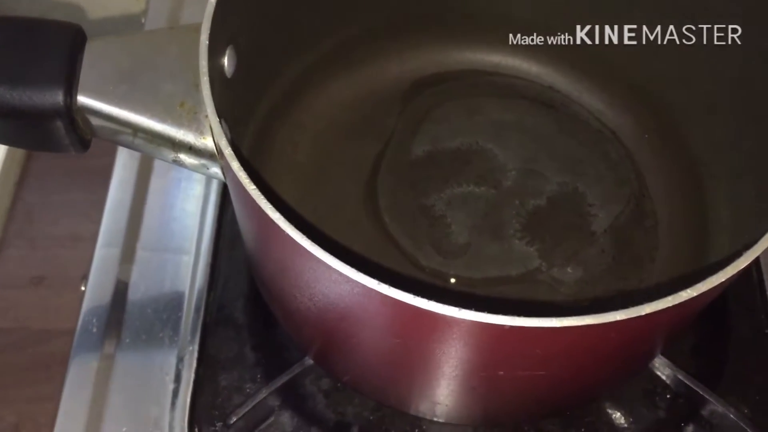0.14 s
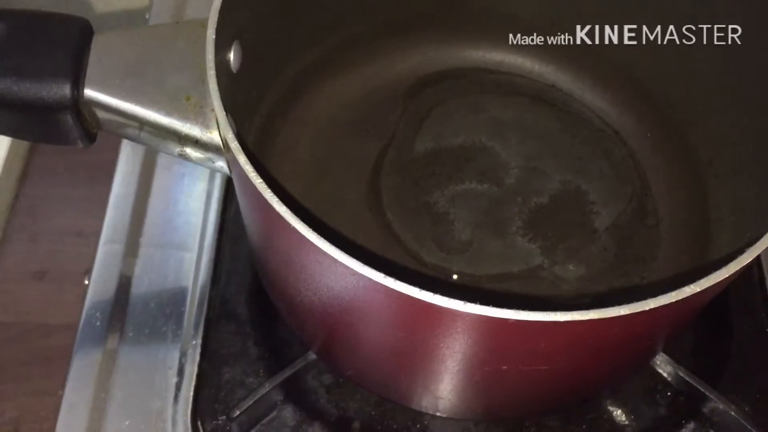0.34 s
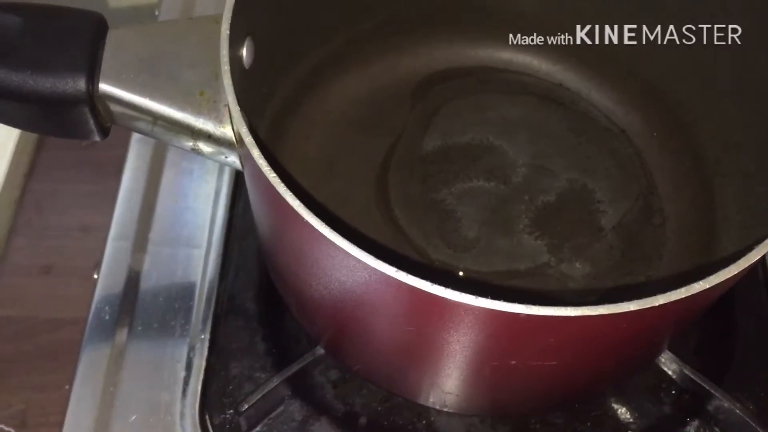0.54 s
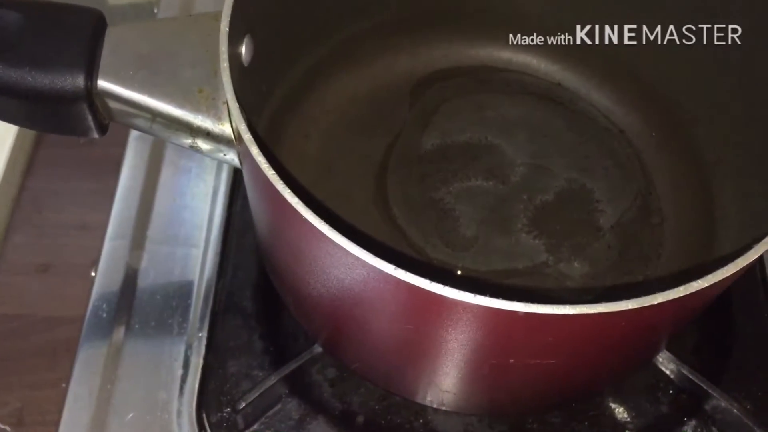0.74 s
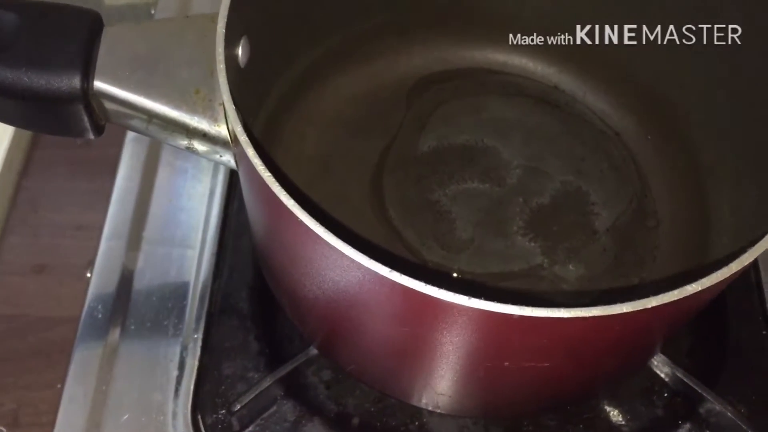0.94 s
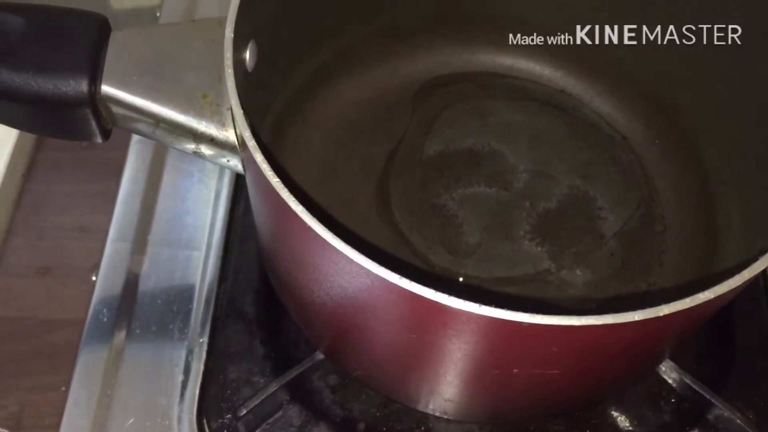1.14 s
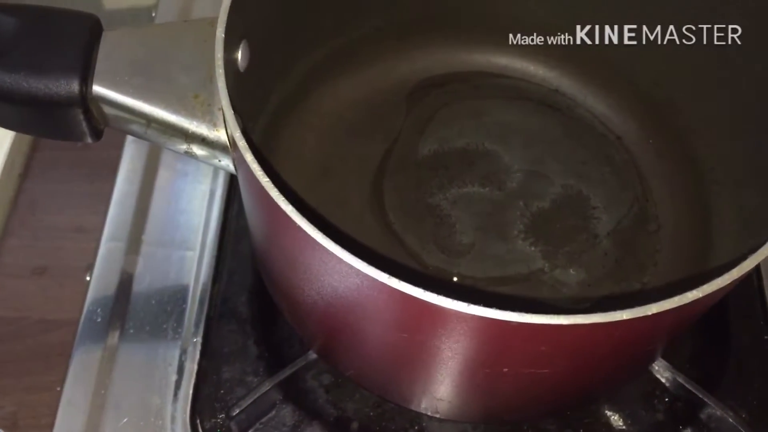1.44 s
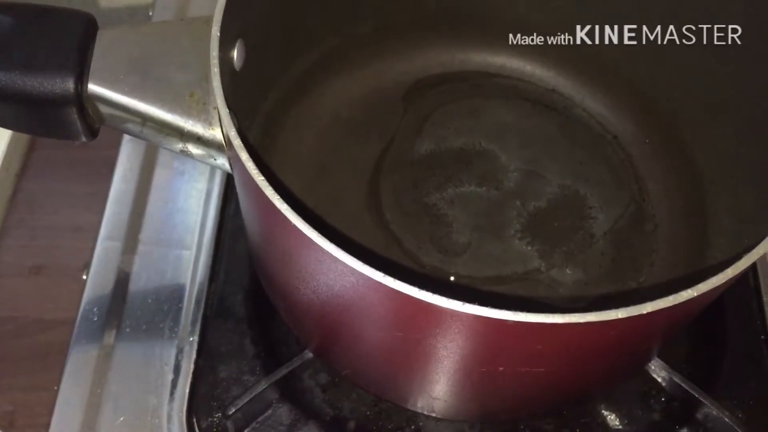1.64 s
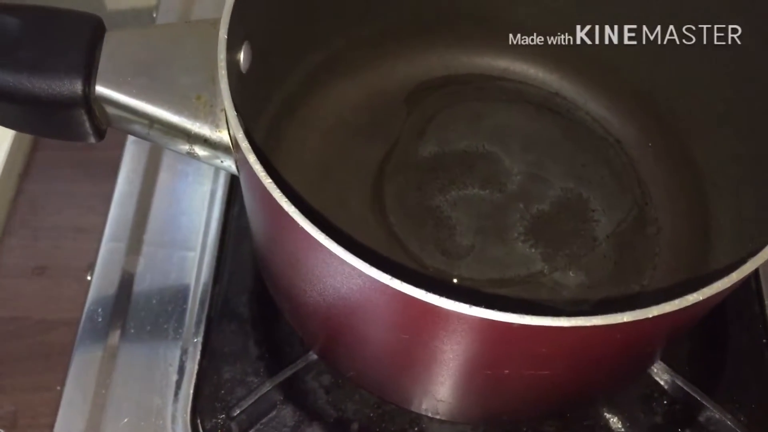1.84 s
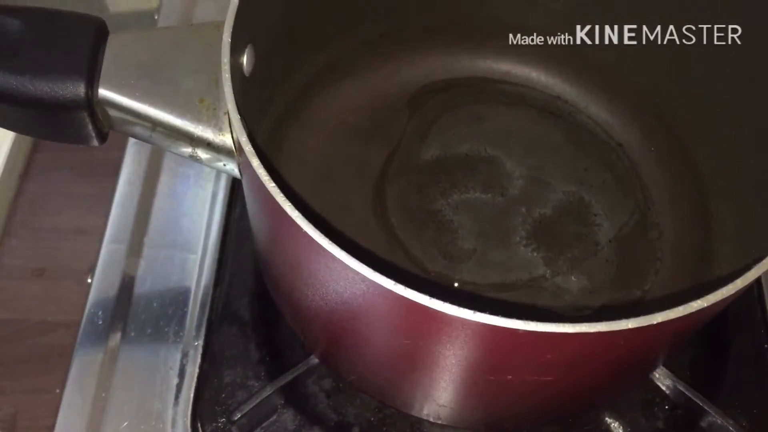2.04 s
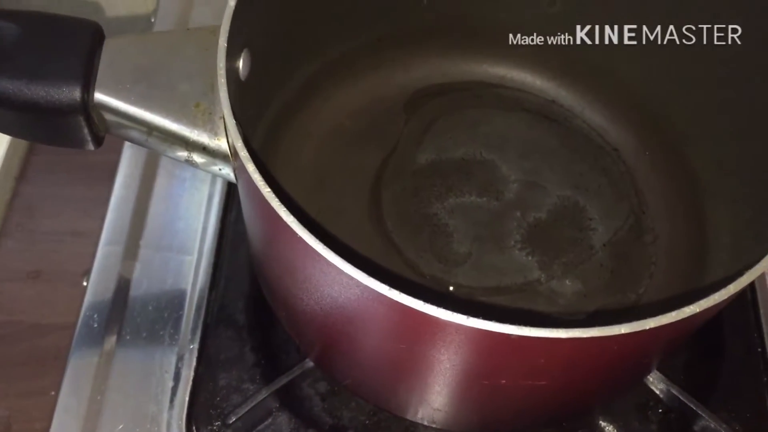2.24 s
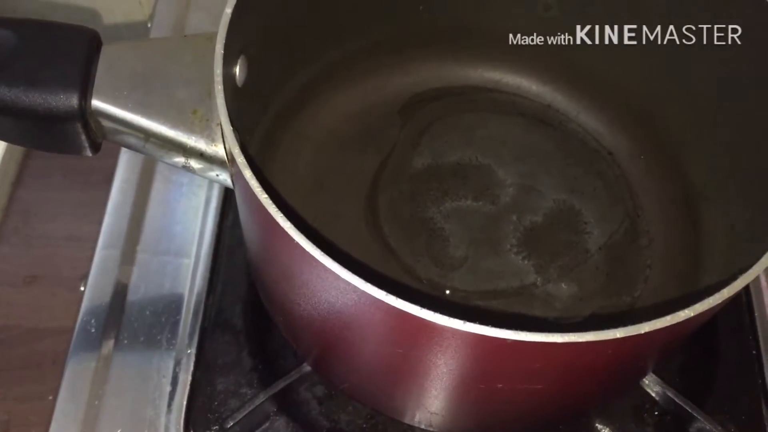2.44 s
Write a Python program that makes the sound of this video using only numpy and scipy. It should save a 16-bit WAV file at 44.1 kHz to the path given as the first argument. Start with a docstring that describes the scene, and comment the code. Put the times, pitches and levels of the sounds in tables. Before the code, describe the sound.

Close to a kitchen stove, a gas flame gives a soft, low roar over a fan's hum. The oil in the saucepan snaps faintly at first, the pan ticks lightly midway, and a few more tiny snaps follow.

```python
"""A gas burner roars softly under a saucepan of oil in a small kitchen.
The flame is a bed of noise that booms in the low resonances of room and stove, and breathes in puffs.
On top, the warming oil snaps, a droplet pings on the rim and the pan ticks on its trivet.
Behind it all, an extractor fan adds mains hum and wavering blade tones."""
import sys
import numpy as np
from scipy import signal
from scipy.fft import rfft, irfft
from scipy.io import wavfile
from scipy.ndimage import uniform_filter1d

SR = 44100
rng = np.random.default_rng(int(sys.argv[2]) if len(sys.argv) > 2 else 0)


def digitize_waveform(pressure):
    """Quantize a signal to 16-bit integers and store it at the path in sys.argv[1].

    Rows of a 2-D input are taken as channels; values are limited to [-1, 1].
    """
    field = np.atleast_2d(pressure).T
    bounded = np.clip(field, -1, 1)
    quanta = np.round(bounded * 32767).astype(np.int16)
    wavfile.write(sys.argv[1], SR, quanta)


N = 114660

# broad colour of flame roar and air rush: frequency_hz, relative_db
ROAR_COLOUR = [(20, -53), (45, -18), (90, -17.5), (105, -10), (150, -11.5), (270, -24), (700, -32.5),
               (1450, -33.5), (1520, -36.5), (2050, -34), (2300, -40.5), (3000, -46.5), (4200, -51.5),
               (4900, -57.5), (6200, -56.5), (9500, -63), (10500, -66), (12500, -64), (15500, -69)]
# resonances of room and stove, with one notch: centre_hz, width_hz, gain_db
ROOM_RESONANCES = [(50, 9.1, 4.5), (112.26, 10.2, 14), (134, 12.8, 11.5), (143.7, 9.8, 6),
                   (174.4, 4.6, 6.5), (182, 4.1, 3.5), (228.3, 16, 5), (286, 14, -7), (353.2, 33, 4),
                   (409, 15, 5.5), (449, 32, 3), (526, 57, 3), (605, 33.5, 9), (646, 24, 7.5),
                   (765, 21, 8.5), (808, 45, 6), (920, 42, 5.5), (1045, 30, 7), (1220, 38, 5),
                   (1298, 20, 5), (1355, 53, 8), (1375, 50, 2.5), (1462, 37, 7.5), (1709, 180, 5),
                   (1960, 28, 5.5)]
# fader rides for the rumble and the sub below it, each taken about its mean: time_s, level_db
RUMBLE_RIDE = [(0, -42), (.3, -40.5), (.7, -39.5), (1.0, -38), (1.3, -42.5), (1.55, -35), (1.75, -42.5),
               (1.9, -42.5), (2.15, -37.5), (2.6, -45)]
SUB_RIDE = [(0, -51), (.7, -50), (.9, -50), (1.6, -45.5), (1.7, -56.5), (2.2, -53), (2.6, -50)]
# oil snaps: start_s, peak_db, low_hz, high_hz
OIL_SNAPS = [(0.0425, -50, 5500, 16000), (0.1254, -38.5, 2500, 9500), (0.1266, -38, 14000, 18000),
             (.2015, -56, 10000, 16000), (1.453, -39.5, 700, 3000), (1.7822, -54, 14000, 17500),
             (1.7843, -30, 10000, 18100)]
# droplets on the rim: start_s, level_db
DROPLET_PINGS = [(0.0423, -39)]
# pan ticks: start_s, level_db, chatter_s, tilt_db_per_octave
PAN_TICKS = [(1.2067, -30.5, .052, 0.5), (2.081, -39.5, 0.01, -22)]
# ringing modes of the rim and of the pan: pitch_hz, relative_db, t60_s
RIM_MODES = [(6200, -1.5, 0.011), (8150, 2.5, 0.010), (8900, -3, 0.022), (9400, -9, 0.012),
             (10100, -7, 0.013)]
PAN_MODES = [(1327, 2.5, 0.062), (1735, 5, 0.04), (2050, 1.5, 0.046), (2820, -3, 0.015), (3164, 0.5, 0.034),
             (3340, 14, 0.013), (3670, -7, 0.028), (4126, -3.5, 0.1)]
# partials of the fan's motor hum and of its blade tone: harmonic_number, rms_db
HUM_PARTIALS = [(1, -42), (2, -51), (3, -62), (4, -72.5)]
BLADE_PARTIALS = [(1, -50), (2, -61), (3, -72)]


def burner_roar(base_db=-35, top_hz=15750, sub_top_hz=83, rumble_top_hz=163, puff_db=1.5, puff_s=0.017):
    """Flame noise excites room and stove; the sub swells, the rumble puffs, the rush above flickers."""
    t = np.arange(N) / SR
    hz = np.fft.rfftfreq(N, 1 / SR)
    colour_hz, colour_db = np.transpose(ROAR_COLOUR)
    colour = amp(np.interp(np.log(hz + 1), np.log(colour_hz), colour_db)) * (hz < top_hz)
    room_power = 1 + sum((amp(2 * db) - 1) / (1 + (2 * (hz - centre) / width) ** 2) ** 2
                         for centre, width, db in ROOM_RESONANCES)
    spectrum = rfft(rng.standard_normal(N)) * colour * np.sqrt(room_power)
    spectrum *= amp(base_db) / np.std(irfft(spectrum, N))
    # steep crossovers split the roar into three bands
    above_sub = 1 / (1 + (sub_top_hz / (hz + 1)) ** 16)
    above_rumble = 1 / (1 + (rumble_top_hz / (hz + 1)) ** 16)
    puff_shape = signal.windows.hann(round(2 * puff_s * SR))
    puffs = unit_rms(signal.fftconvolve(rng.standard_normal(N), puff_shape, "same"))
    sub = irfft(spectrum * (1 - above_sub), N) * amp(ride_db(SUB_RIDE, t))
    rumble = irfft(spectrum * (above_sub - above_rumble), N)
    rumble *= amp(ride_db(RUMBLE_RIDE, t) + puff_db * puffs)
    rush = irfft(spectrum * above_rumble, N)
    return sub + rumble + flame_flicker(rush)


def flame_flicker(rush, flicker_db=0.59, broad_db=1.0, narrow_db=2, narrow_top_hz=3020):
    """The rush flickers in level while broad and narrow patches of its colour come and go."""
    hz, _, spectra = signal.stft(rush, SR, nperseg=512, noverlap=384)

    def patches(frames, bins):
        slow_noise = uniform_filter1d(rng.standard_normal(spectra.T.shape), frames, axis=0)
        return unit_rms(uniform_filter1d(slow_noise, bins, axis=1)).T

    broad = patches(frames=20, bins=8)
    flicker = unit_rms(uniform_filter1d(rng.standard_normal(spectra.shape[1]), 6))
    narrow = patches(frames=16, bins=2) / (1 + (hz[:, None] / narrow_top_hz) ** 2)
    gain = amp(broad_db * broad + flicker_db * flicker + narrow_db * narrow)
    return signal.istft(spectra * gain, nperseg=512, noverlap=384)[1][:N]


def oil_snap(peak_db, low_hz, high_hz):
    """Warming oil snaps: a sharp click, a short scatter of reflections and a faint fizz in one band."""
    t = np.arange(4000) / SR
    reflections = decay(t, start_db=-22, t60_s=0.012)
    fizz = decay(t, start_db=-38, t60_s=0.06)
    burst = (reflections + fizz) * rng.standard_normal(len(t))
    burst[0] = 1  # the click
    snap = signal.lfilter(*signal.butter(2, [low_hz, high_hz], "band", fs=SR), burst)
    return amp(peak_db) * snap / abs(snap[:20]).max()


def droplet_ping(level_db):
    """A droplet strikes the rim and sizzles briefly on it."""
    t = np.arange(8000) / SR
    sizzle = decay(t, start_db=-42, t60_s=0.2) * rng.standard_normal(len(t))
    sizzle[0] = 1  # the strike
    return amp(level_db) * signal.fftconvolve(sizzle, metal_ring(RIM_MODES, attack_s=0.00068))


def pan_tick(level_db, chatter_s, tilt_db_per_octave, chatter_db=-30, blows_per_s=3000):
    """The pan shifts on its trivet: one blow, then a brief dense chatter of small ones."""
    t = np.arange(6000) / SR
    blows = amp(chatter_db) * rng.standard_normal(len(t))
    blows *= (rng.random(len(t)) < blows_per_s / SR) & (t < chatter_s)
    blows[0] = 1
    lowest_hz = PAN_MODES[0][0]
    modes = [(hz, db + tilt_db_per_octave * np.log2(hz / lowest_hz), t60) for hz, db, t60 in PAN_MODES]
    return amp(level_db) * signal.fftconvolve(blows, metal_ring(modes, attack_s=0.0015))


def metal_ring(modes, attack_s):
    """Softly struck metal rings out in dying modes, with a peak of 1."""
    t = np.arange(6000) / SR
    ring = sum(decay(t, db, t60) * np.sin(2 * np.pi * hz * t) for hz, db, t60 in modes)
    ring *= np.sin(np.pi / 2 * np.minimum(t / attack_s, 1)) ** 2
    return ring / abs(ring).max()


def extractor_fan(hum_hz=100.02, blade_hz=168.7, waver_depth=0.0032):
    """The motor hums steadily with the mains while the blade tone wavers slightly in pitch."""
    def tone(partials, cycles):
        return sum(np.sqrt(2) * amp(db) * np.sin(2 * np.pi * (harmonic * cycles + rng.random()))
                   for harmonic, db in partials)

    t = np.arange(N) / SR
    waver = sum(np.sin(2 * np.pi * (hz * t + rng.random())) / np.sqrt(hz)
                for hz in np.geomspace(0.3, 5, 12))
    blade_cycles = np.cumsum(blade_hz * (1 + waver_depth * unit_rms(waver))) / SR
    return tone(HUM_PARTIALS, hum_hz * t) + tone(BLADE_PARTIALS, blade_cycles)


def amp(db):
    return 10 ** (np.asarray(db) / 20)


def decay(t, start_db, t60_s):
    return amp(start_db - 60 * t / t60_s)


def unit_rms(x):
    return x / np.sqrt(np.mean(x ** 2) + 1e-20)


def ride_db(points, t):
    """A fader curve in dB about its own mean."""
    db = np.interp(t, *np.transpose(points))
    return db - db.mean()


def place(mix, start_s, sound):
    part = mix[round(start_s * SR):][:len(sound)]
    part += sound[:len(part)]


def scene():
    """A mono bed of burner and fan, with the oil and pan sounds spotted on top."""
    mix = burner_roar() + extractor_fan()
    for start_s, *snap in OIL_SNAPS:
        place(mix, start_s, oil_snap(*snap))
    for start_s, level_db in DROPLET_PINGS:
        place(mix, start_s, droplet_ping(level_db))
    for start_s, *tick in PAN_TICKS:
        place(mix, start_s, pan_tick(*tick))
    return mix[None]


def record(dry):
    """A steep low-pass trims the very top of the mix."""
    low_pass = signal.firwin(511, cutoff=16530, window=("kaiser", 9), fs=SR)
    return signal.oaconvolve(dry, low_pass[None], "same")


dry = scene()
out = record(dry)
digitize_waveform(out)
```